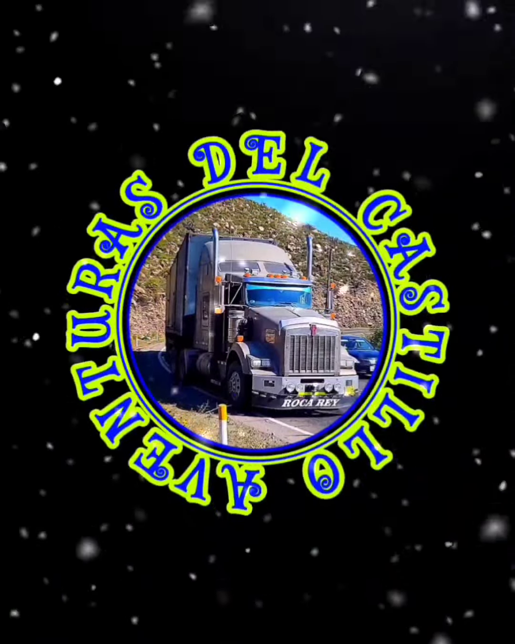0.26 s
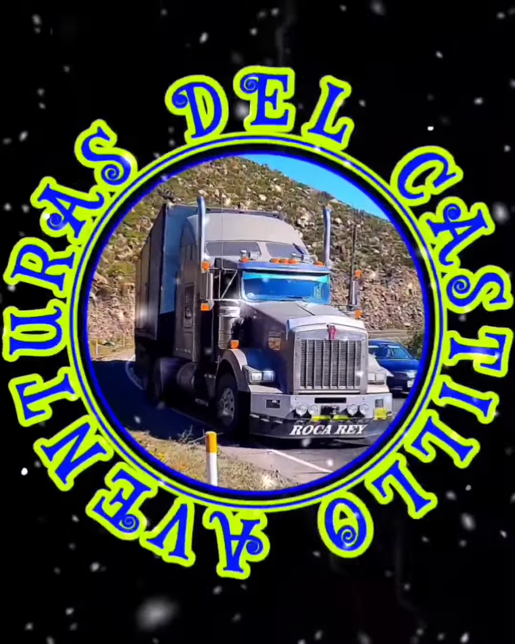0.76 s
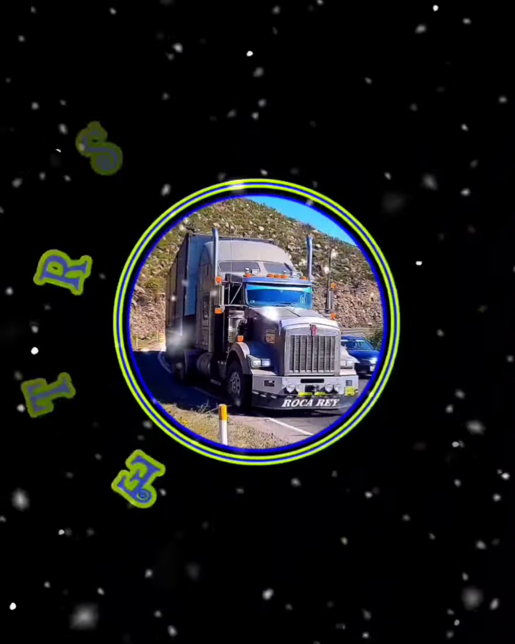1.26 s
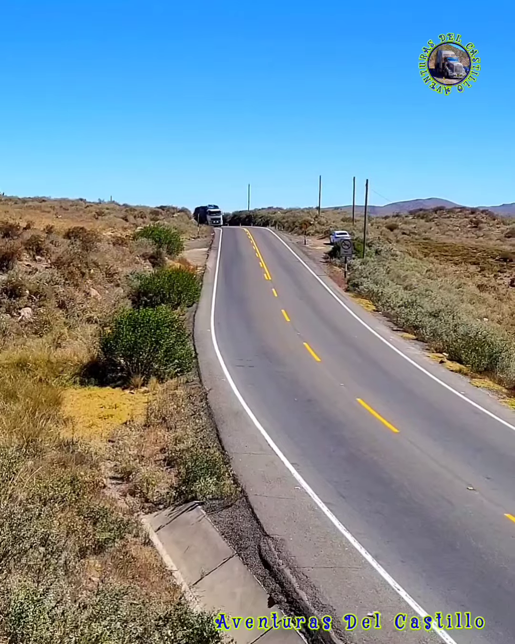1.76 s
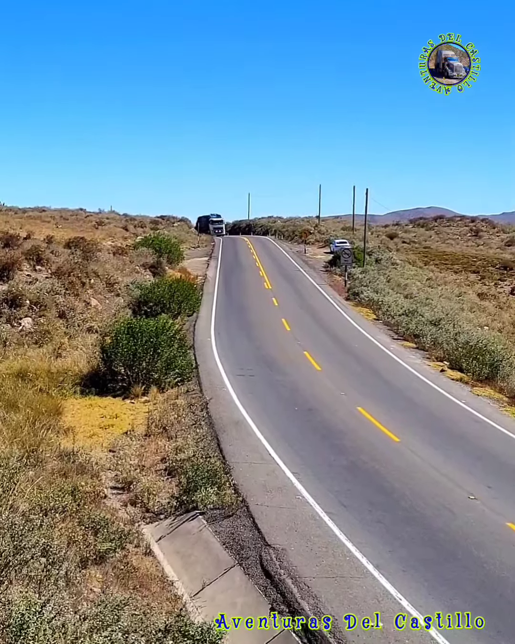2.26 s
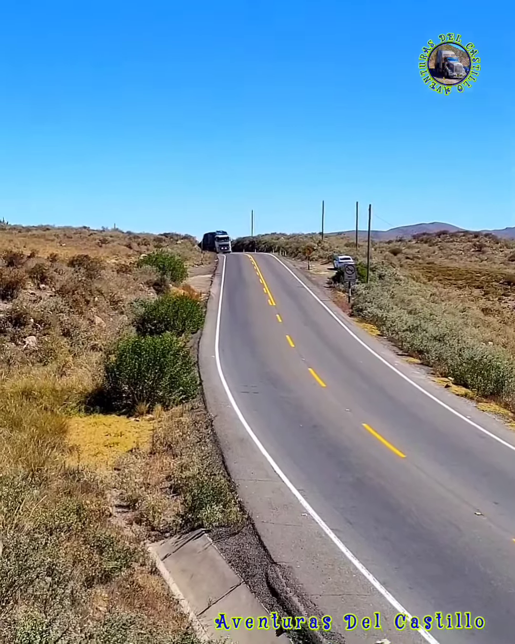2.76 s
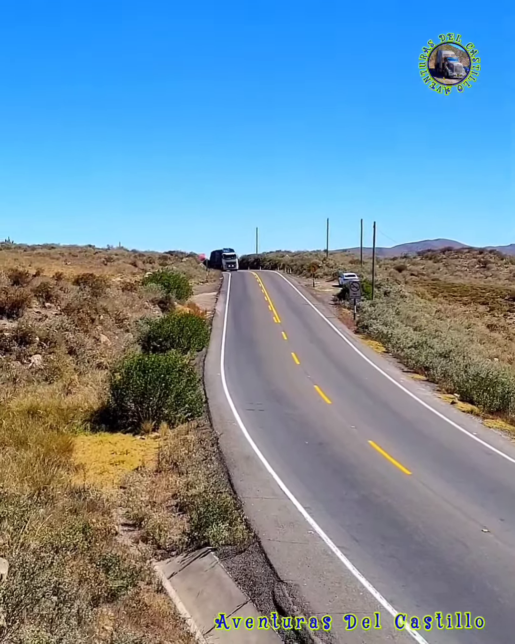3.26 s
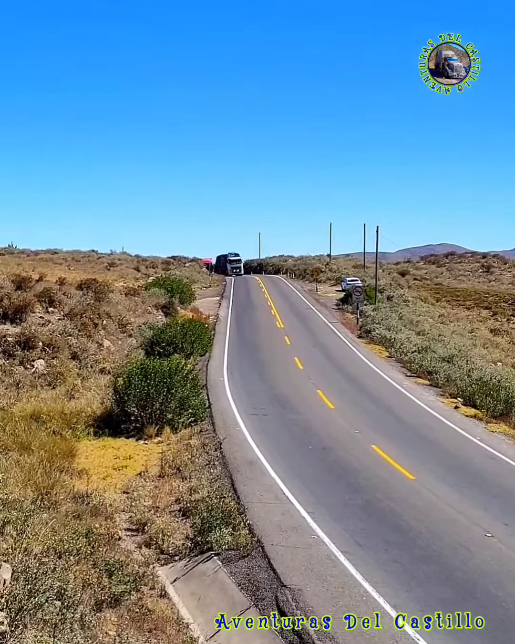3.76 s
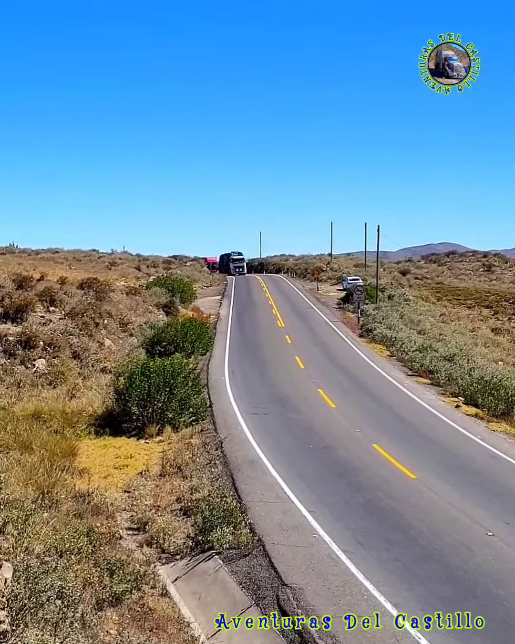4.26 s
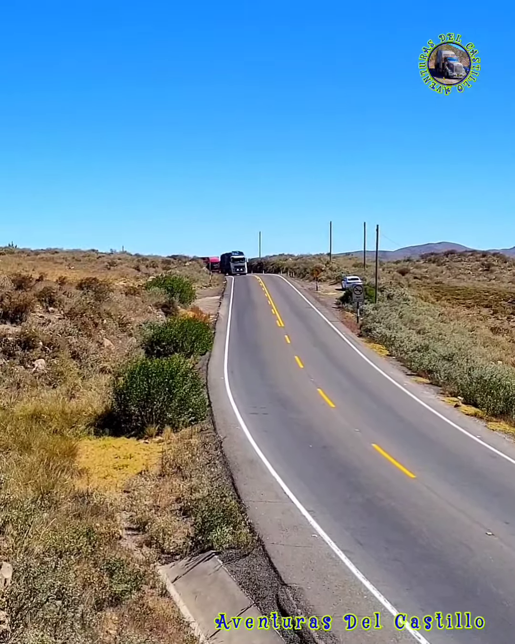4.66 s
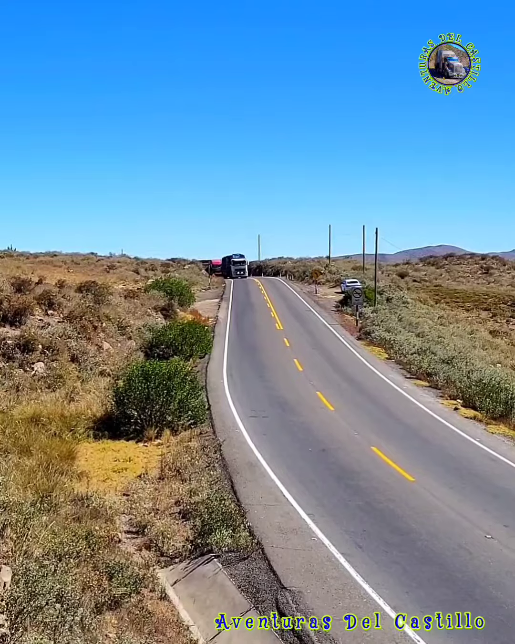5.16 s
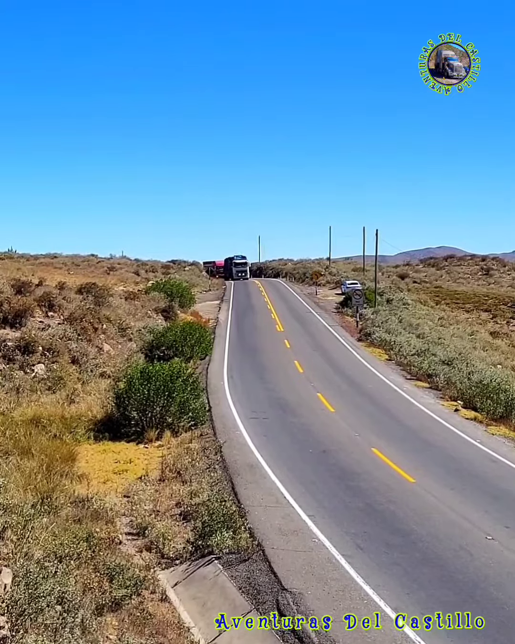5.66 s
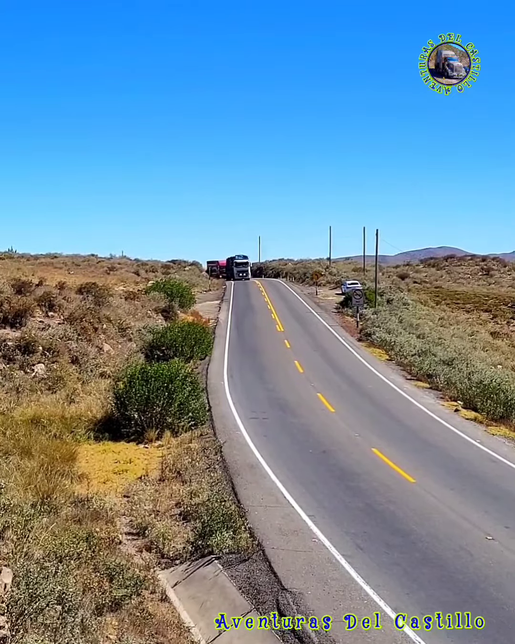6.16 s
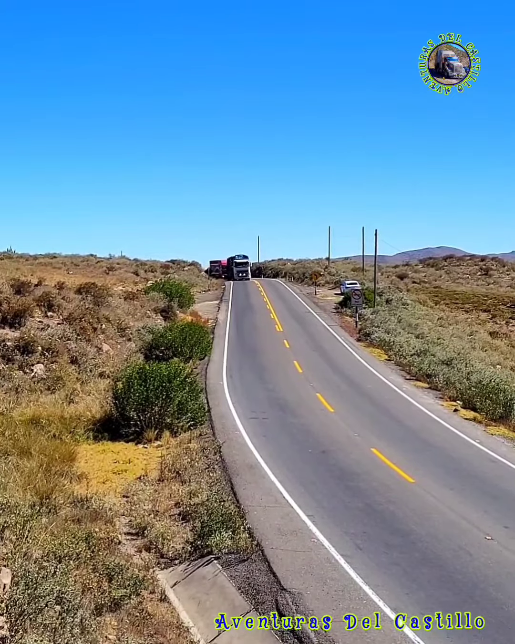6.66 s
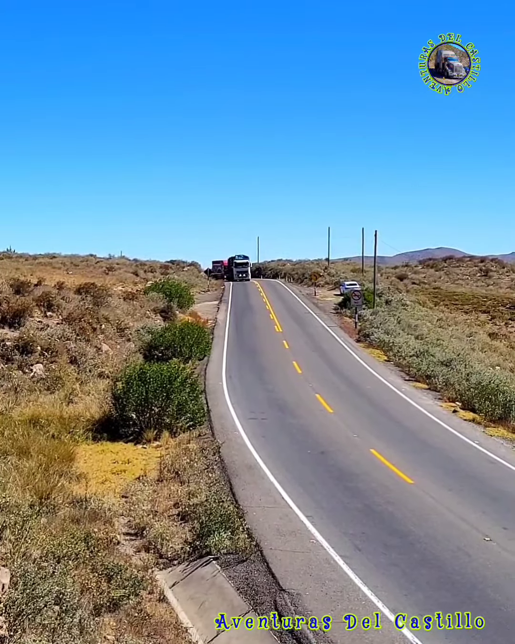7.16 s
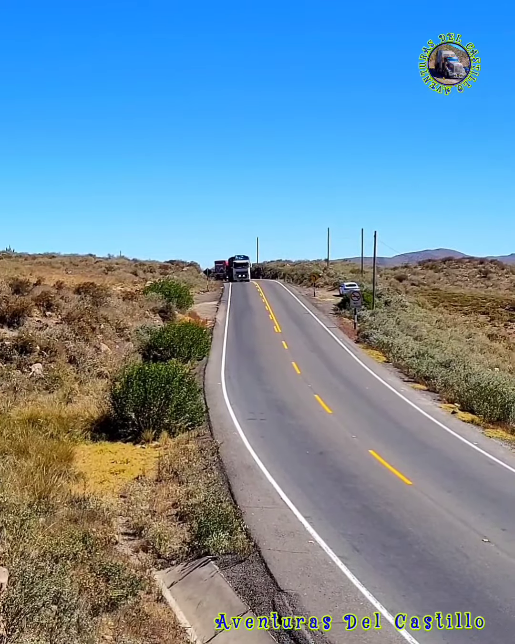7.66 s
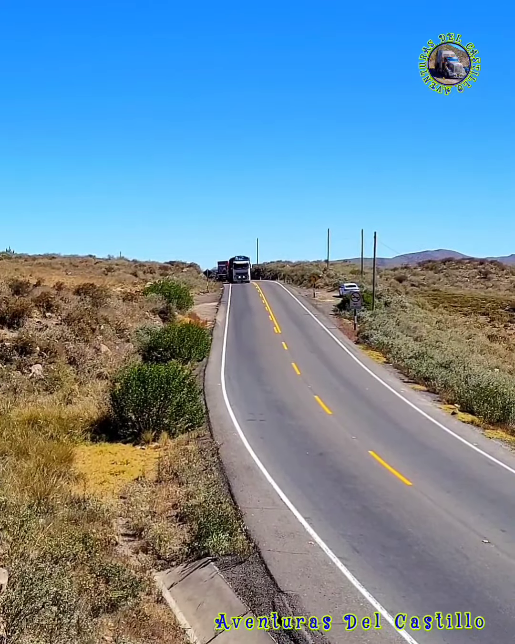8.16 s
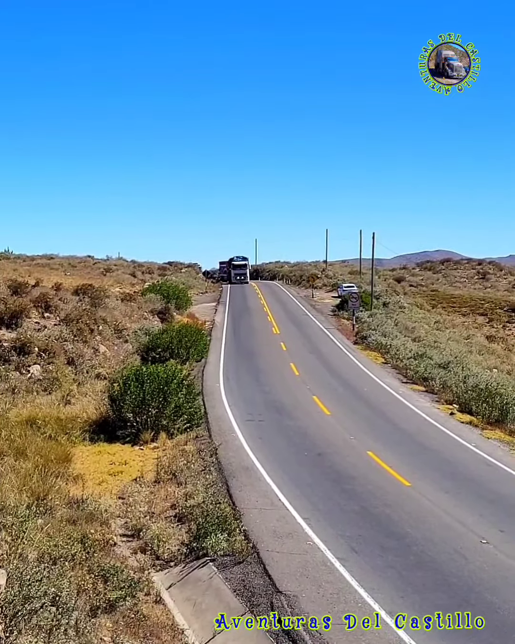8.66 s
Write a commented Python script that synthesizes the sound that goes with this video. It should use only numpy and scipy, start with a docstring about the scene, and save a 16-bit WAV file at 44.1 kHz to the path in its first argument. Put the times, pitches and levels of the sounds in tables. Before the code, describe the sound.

Twin air horns blare three times in under a second, bright and brassy with hissing air and a short dull outdoor echo, above a low diesel engine. Engine and roar continue, then stop dead. A short gap leads to a faint open roadside, where far trucks wash and hum, gradually growing, and soft wind buffets bump the microphone, strongest early on.

```python
"""Twin air horns of a diesel truck close by blast three times over its own engine, drones and road roar.
Each horn is a stack of wavering multiples behind an air valve; the engine is a set of cycle lines.
After a short silence, an open highway: far trucks, made of shaped noise and a narrow drone, rumble
slowly nearer, while wind thumps on the microphone as low noise and brief sine bursts.
Dull ticks, thin rustles and a faint steady hiss lie beneath."""
import sys
import numpy as np
from scipy import signal
from scipy.io import wavfile
from scipy.ndimage import uniform_filter1d

SR = 44100
rng = np.random.default_rng(int(sys.argv[2]) if len(sys.argv) > 2 else 0)


def generate_wav(sig):
    """Save sig (samples, or channels by samples) to the path in sys.argv[1] as 16-bit PCM at SR."""
    pcm = np.round(np.clip(np.atleast_2d(sig).T, -1, 1) * 32767).astype(np.int16)
    wavfile.write(sys.argv[1], SR, pcm)


N = 393813
T = np.arange(N) / SR
NEAR_END_S, FAR_START_S = 1.407, 1.506
EDGE_HZ = 15620  # top of the sound band
OPEN_DB = -19  # below this the horn valve is closing

# horn blasts: opens_s, shuts_s, level_db (at opening, before the sag), rise_s
BLASTS = [(-.02, 0.063, -12.5, 0.0056), (0.195, 0.323, -12, 0.0081), (.413, 0.631, -12.5, .028)]


def gain_of(db):
    """Amplitude factor of a level in dB."""
    return 10 ** (np.asarray(db) / 20)


def evened(x):
    """Scale a signal to rms 1."""
    return x / np.sqrt(np.mean(x ** 2) + 1e-20)


def read(points, hz):
    """Read a curve of (Hz, value) points along log frequency."""
    f, value = np.transpose(points)
    return np.interp(np.log(hz + 1), np.log(f + 1), value)


def columns(rows, t):
    """Glide every column after the first, which is time in s, along t."""
    s, *rest = np.transpose(rows)
    return [np.interp(t, s, column) for column in rest]


def steady(points):
    """A noise colour that stays the same in every frame."""
    return lambda hz, s: read(points, hz) + 0 * s


def wander(t, per_s):
    """Slow chance of rms about 1: sines of random phase up to a rate in cycles per s."""
    f = np.geomspace(per_s / 12, per_s, 12)[:, None]
    coarse = np.arange(t[0], t[-1] + .01, .005)
    sines = np.sin(2 * np.pi * (f * coarse + rng.random(f.shape)))
    slow = (sines / np.sqrt(f)).sum(0)
    return np.interp(t, coarse, slow / np.sqrt(np.sum(.5 / f)))


def noise(t, colour_db, same, patchy_db, flicker_db, lean=((1, 0), (2, 0)), patch_frames=10, patch_bins=14):
    """Stereo noise of rms 1 from random short-time spectra; colour_db(hz, s) shapes each frame."""
    frames, hz = len(t) // 256 + 5, np.fft.rfftfreq(1024, 1 / SR)
    a, b, c, d, patches = rng.standard_normal((frames, 513, 5)).T
    flicker = evened(uniform_filter1d(patches.mean(0), size=3))
    patches = uniform_filter1d(patches, size=round(patch_frames), axis=1)
    patches = evened(uniform_filter1d(patches, size=round(patch_bins), axis=0))

    shape = gain_of(colour_db(hz[:, None], t[0] + np.arange(frames) * 256 / SR))
    shape = shape / np.linalg.norm(shape, axis=0)  # only the balance of the colour counts
    shape = shape * gain_of(patchy_db * patches + flicker_db * flicker)

    like = np.clip(read(same, hz), -1, 1)[:, None]  # left-right likeness
    tilt = gain_of(read(lean, hz) / 2)[:, None]
    left = a + 1j * b
    right = like * left + np.sqrt(1 - like ** 2) * (c + 1j * d)
    spectra = shape * np.array([left * tilt, right / tilt])
    return evened(signal.istft(spectra, nperseg=1024, noverlap=768)[1][:, :len(t)])


def drone(width_hz, rows, t, fuzz):
    """A tone mixed with noise in a narrow band round it; fuzz is the noise's share of the mix."""
    hz, db = columns(rows, t)
    keep = np.exp(-np.pi * width_hz / SR)
    chance = rng.standard_normal((len(t) + SR, 2)) @ [1, 1j]
    blur = signal.lfilter([1], [1, -keep], chance)[SR:] * np.sqrt((1 - keep ** 2) / 2)
    blur = uniform_filter1d(blur.real, size=300) + 1j * uniform_filter1d(blur.imag, size=300)
    carrier = np.exp(2j * np.pi * np.cumsum(hz) / SR)
    wave = (np.sqrt(1 - fuzz) + np.sqrt(fuzz) * blur) * carrier
    return np.sqrt(2) * gain_of(db) * wave.real


def horns(t):
    """Both trumpets open together over hissing air; the hillside sends a short, dull wash back."""
    # each trumpet: pitch_hz, then the relative level_db of its multiples 1, 2, 3, ..
    low_horn = 208.7, [-13, -11, -13, -2.5, -6.5, -10.5, -6.5, -14, -15.5, -12, -11, -12, -13, -8, -15.5,
                -14, -15, -18.5, -21, -17.0, -16.5, -18.5, -17, -18, -14, -18.5, -18.5, -17, -18, -13.5]
    high_horn = 259.3, [-5.5, -6, -6, -4, -6.5, -7.5, -13, -12.5, -10, -14, -8, -16, -11.5, -13.5, -17.5,
                 -17.5, -17, -20, -14.5, -17, -17, -18, -17, -11]
    # share of the closing fall that the low partials of the low and the high trumpet escape
    low_linger, high_linger = 0.18, 0.26
    # hiss of the air through the horns: pitch_hz, relative density_db (per Hz)
    air_jet = [(300, -25.5), (1200, -4.5), (4000, -9), (9600, -16.5), (15000, -17)]

    t_open = t[:round(.75 * SR)]  # the horns are over by .75 s
    jet = noise(t_open, steady(air_jet), [(500, .8), (5000, .2)], patchy_db=1.0, flicker_db=1.6)
    pair = trumpet(t_open, *low_horn, low_linger) + trumpet(t_open, *high_horn, high_linger)
    both = (evened(pair) + gain_of(-20.0) * jet) * gain_of(valve_db(t_open))
    both = np.pad(both, ((0, 0), (0, len(t) - len(t_open))))

    lag = np.arange(SR // 2) / SR
    taps = rng.standard_normal((2, len(lag))) * gain_of(-60 * lag / 0.3) * (lag > .012)
    taps = signal.lfilter(*signal.butter(1, 4000, fs=SR), taps)
    echo = signal.fftconvolve(both, taps / np.linalg.norm(taps[0]), axes=1)[:, :len(t)]
    return both + gain_of(-17) * echo


def trumpet(t, hz, levels_db, linger):
    """A beating diaphragm gives every multiple; reflections make each swell and shift by itself on each side."""
    # upper partials past the listed multiples: pitch_hz, relative level_db
    bell = [(6500, -19), (8000, -20.5), (9600, -27), (12000, -23), (15000, -30.5)]
    # as the truck moves on, some partials swell, others sink and the treble dulls: pitch_hz, drift_db_per_s
    horn_drift = [(500, 4.5), (790, 16), (1040, -11), (1280, 8), (1460, -10), (1670, 17.5), (1815, -12),
                  (1900, 5.5), (3300, -0.5), (3900, -6.5)]
    # stereo balance: pitch_hz, left_minus_right_db
    horn_lean = [(600, 0.5), (2500, 3.5), (5000, 1), (9000, -5.5), (13000, 0)]
    burst_peak_db, burst_s = 4, 0.024  # first rush of air, driving the low partials harder

    turns = np.cumsum(hz * (1 + .0008 * wander(t, 20) + .001 * wander(t, 90))) / SR
    out = np.zeros((2, len(t)))
    closing_db = np.clip(valve_db(t) - OPEN_DB, -20, 0)
    burst_db = sum(burst_peak_db * np.exp(-abs(t - opens - rise) / burst_s) for opens, _, _, rise in BLASTS)
    opened = np.transpose(BLASTS)[0]
    held_s = t - opened[np.searchsorted(opened, t) - 1]
    dull_db = -55 * np.maximum(held_s - .11, 0)  # the treble fails first in a long blast

    for k in range(1, int(EDGE_HZ / hz)):
        partial_hz = k * hz
        level_db = levels_db[k - 1] if k <= len(levels_db) else read(bell, partial_hz)
        low = max(1 - partial_hz / 4000, -.5)  # low partials outlast the treble as the air fails
        swell_db = low * (burst_db - linger * closing_db)
        swell_db = swell_db + read(horn_drift, partial_hz) * (t - .3)
        swell_db = swell_db + dull_db * np.clip(partial_hz / 2000 - 1.5, 0, 1) + 3.0 * wander(t, 12)
        start = rng.random()
        apart = min(partial_hz / 4000, 1.6)  # short waves reach the two ports differently
        for side, lean_db in zip(out, read(horn_lean, partial_hz) * np.array([.5, -.5])):
            gain = gain_of(level_db + swell_db + lean_db + 1.5 * apart * wander(t, 6))
            shift = 1.1 * apart * wander(t, 8)
            side += gain * np.cos(2 * np.pi * (k * turns + start) + shift)
    return out


def valve_db(t):
    """Each blast rises quickly, sags while held and falls away ever faster once shut."""
    sag_db_per_s = 15.5  # the air tank runs down while the valve is open
    shut_db, release_s, release_bend = -49.5, .057, 1.3  # shut level, time to fall to it, shape of the fall
    opens, shuts, db, rise = np.transpose(BLASTS)[:, :, None]
    held_db = db - sag_db_per_s * (t - opens)
    unopened = np.maximum(1 - (t - opens) / rise, 0)
    released = (np.maximum(t - shuts, 0) / release_s) ** release_bend
    blasts_db = held_db + (shut_db - held_db) * (unopened + released)
    return np.maximum(blasts_db.max(0), shut_db - 19.5)


def engine(t):
    """Lines at multiples of the engine cycle, the lower ones unsteady; their balance turns as the truck moves."""
    # engine speed: time_s, cycles_per_s
    speed = [(0, 19.5), (.6, 18.9), (1.41, 19.25)]
    # engine lines: multiple of the cycle, first_db, last_db
    firing = [(3, -28.5, -23.5), (4, -19, -26.5), (6, -33.5, -27), (8, -33.5, -26), (10, -30, -24.5),
              (12, -26, -17)]
    turns, way = np.cumsum(columns(speed, t)[0]) / SR, t / NEAR_END_S
    out = np.zeros(len(t))
    for k, first_db, last_db in firing:
        level_db = first_db + (last_db - first_db) * way + 6 / k * wander(t, 10)
        out += gain_of(level_db) * np.cos(2 * np.pi * (k * turns + rng.random()))
    return np.sqrt(2) * out


def truck_drones(t):
    """Wavering narrow-band tones, stronger on the right; the last two beat together."""
    # each drone: width_hz, then rows of time_s, pitch_hz, level_db (before the stereo lean)
    drones = [(3, [(0, 139.1, -22), (.55, 138.4, -20.5), (.9, 141, -28.5), (1.41, 141.1, -22.5)]),
              (30, [(0, 261, -15.5), (.53, 264.5, -19.5), (.65, 263.3, -38.5), (1.41, 264, -46)]),
              (1.997, [(0, 485.8, -40), (1.41, 483.5, -33.5)]), (2, [(0, 496.5, -40.5), (1.41, 495, -35)])]
    return gain_of([[-1.5], [1.5]]) * sum(drone(*rows, t, fuzz=.3) for rows in drones)


def road_roar(t):
    """Broad noise of steady colour whose level swells, then sinks."""
    # roar colour: pitch_hz, relative density_db (per Hz)
    colour = [(12, -38), (20, -8), (196, -6.5), (232, -9), (259, -11), (372, -27.5), (491, -17),
              (581, -21.5), (1200, -22.5), (1380, -29), (2680, -31.5), (15500, -74)]
    # roar level: time_s, level_db
    level = [(0, -16.5), (.4, -14.5), (.7, -18), (1.41, -19)]
    # stereo width: pitch_hz, left-right likeness (0 to 1)
    same = [(250, .975), (640, .88), (1400, .53), (3100, 0), (6800, .44)]
    return noise(t, steady(colour), same, patchy_db=1.1, flicker_db=1.0) * gain_of(columns(level, t)[0])


def near_truck():
    """Horns, engine, drones and roar; the sound drops for its last moments and stops dead."""
    t = T[:round(NEAR_END_S * SR)]
    mix = horns(t) + engine(t) + truck_drones(t) + road_roar(t)
    return mix * np.where(t > 1.398, gain_of(-8.0), 1)


def highway(t):
    """Tyre and exhaust wash, dulled by the air on its long way; it reaches the left port first."""
    # approach: time_s, level_db of the wash without its whines, treble_db_per_khz regained as trucks near
    approach = [(1.51, -51, -1.5), (2.7, -49, -2), (4.5, -44.5, -1.5), (5.2, -47, -2), (5.8, -43.5, 0),
                (7.2, -42.5, 0), (7.9, -38.5, 1), (8.4, -39.5, 0.5), (8.93, -41, 1)]
    # wash colour: pitch_hz, relative density_db (per Hz)
    tyres = [(90, -44), (160, -19), (260, -6.5), (500, 0), (640, -3.5), (1400, -6), (1780, -14),
             (1900, -18), (2700, -22), (2850, -32.5), (3200, -32.5), (3500, -45.5), (3900, -51),
             (4100, -63), (7000, -97)]
    # stereo width: pitch_hz, left-right likeness (0 to 1)
    same = [(100, 0.59), (600, 1), (1700, 0.87), (4000, 0.52)]
    # stereo balance: pitch_hz, left_minus_right_db
    lean = [(200, 1.5), (700, 1), (2400, -2), (4400, -23.5)]
    # faint tones in the wash: pitch_hz, level_db relative to the wash
    whines = [(536, -14.5), (1000, -13), (1242, -17.5)]
    # far drone: width_hz, then rows of time_s, pitch_hz, level_db
    far_drone = 7, [(1.5, 259.1, -46), (2.2, 259.2, -46.5), (2.86, 259, -57), (3.5, 258.5, -46),
                 (4.1, 257.9, -44.5), (4.25, 257.7, -49), (4.6, 257.4, -44), (5.05, 257, -41),
                 (5.2, 256.5, -51.5), (5.8, 255.8, -45.5), (7.38, 252.4, -42.5), (7.52, 253.2, -47.5),
                 (8.05, 253.2, -42.5), (8.35, 247.6, -51)]

    def colour_db(hz, s):
        treble_db_per_khz = columns(approach, s)[1] + .5 * wander(s, 25)
        treble_db = treble_db_per_khz * np.minimum(hz, 3000) / 1000
        # moving air shifts the dips of the ground echo
        ground_db = 2.26 * np.sin(hz / 130 + 2 * wander(s, 0.59))
        return read(tyres, hz) + treble_db + ground_db

    wash = noise(t, colour_db, same, patchy_db=2.5, flicker_db=0.67, lean=lean, patch_frames=24, patch_bins=2)
    for hz, db in whines:
        wash = wash + drone(16, [(t[0], hz, db)], t, fuzz=1)
    far = wash * gain_of(columns(approach, t)[0]) + drone(*far_drone, t, fuzz=.1)
    return np.array([far[0], np.roll(far[1], 2)])  # right side 2 samples late


def wind(t):
    """Lumpy low noise, and single eddies that shake the diaphragm for a few cycles."""
    # buffet colour: pitch_hz, relative density_db (per Hz)
    buffet = [(15, -33.5), (30, 5.5), (50, -2.5), (80, 5.5), (110, -17.5), (180, -7.5), (300, -18.5),
              (600, -77), (2000, -110)]
    # wind thumps: start_s, peak_db, pitch_hz, length in cycles
    thumps = [(2.15, -31, 55, 2.5), (2.73, -29, 60, 1.34), (2.769, -28.5, 56.5, 1.5), (2.84, -32, 55, 1.5),
              (2.883, -17.5, 57.5, 1.94), (2.912, -14.5, 63, 1.7), (2.944, -27.5, 56.5, 1.8),
              (3.039, -26.5, 75.4, 2), (5.083, -24.5, 63.8, 3.1), (6.3, -29, 90, 2.3), (6.7, -26, 115, 1.6),
              (7.013, -27.5, 62, 2.9), (7.448, -26.5, 61.8, 3.4), (8.066, -27, 72.7, 3.3),
              (8.76, -28.5, 52.8, 1.9)]
    start_db, rise_db_per_s = -42, .5
    lumps = noise(t, steady(buffet), [(20, 0.97), (200, 0.94)], patchy_db=0.5, flicker_db=1.5)
    out = lumps * gain_of(start_db + rise_db_per_s * (t - t[0]) + 2.76 * wander(t, 12))
    for s, db, hz, cycles in thumps:
        u = (t - s) * hz / max(cycles, .6)  # 0 to 1 through the thump
        at = (u > 0) & (u < 1)
        out[:, at] += gain_of(db) * np.sin(np.pi * u[at]) * np.sin(2 * np.pi * hz * (t[at] - s))
    return out


def ticks(t):
    """Dull ticks and thin rustles right at the microphone, over a faint uneven fizz."""
    # dull ticks: start_s, peak_db, pitch_hz
    dull_ticks = [(2.764, -36, 800), (2.915, -32, 800), (2.948, -31, 900)]
    # thin rustles: start_s, level_db (rms at the crest), length_s, centre_hz
    rustles = [(2.62, -79, .09, 4300), (2.703, -72, .014, 5600), (2.977, -74, .025, 5200),
               (3.02, -78, .02, 5000), (5.103, -77, .01, 4200)]
    air = rng.standard_normal((2, len(t)))

    def band(lo_hz, hi_hz):
        sos = signal.butter(4, [lo_hz, hi_hz], "bandpass", fs=SR, output="sos")
        return evened(signal.sosfilt(sos, air))

    out = band(4600, 7200) * gain_of(-93.5 + 2.5 * wander(t, 5) + 1.5 * wander(t, 60))  # fizz
    for s, db, hz in dull_ticks:
        u = np.clip(t - s, 0, 1)
        swell = np.sin(np.pi * np.clip(u * hz / 2, 0, 1)) ** 2  # two cycles long
        out += gain_of(db) * swell * np.sin(2 * np.pi * hz * u)
    for s, db, length, hz in rustles:
        swell = np.sin(np.pi * np.clip((t - s) / length, 0, 1)) ** 2
        out += gain_of(db) * swell * band(hz / 1.22, hz * 1.22)
    return out


def faint_hiss(t):
    """A very faint, steady, flat hiss, separate on each side."""
    return gain_of(-91) * rng.standard_normal((2, len(t)))


def scene():
    """The near truck, a short silence, then the windy highway."""
    out, near, start = np.zeros((2, N)), near_truck(), round(FAR_START_S * SR)
    out[:, :near.shape[1]] = near
    t = T[start:]
    out[:, start:] = highway(t) + wind(t) + ticks(t) + faint_hiss(t)
    return out


def record(dry):
    """Peaks beyond full scale are clipped; then a steep low-pass limits the band."""
    edge = signal.firwin(1023, EDGE_HZ, window=("kaiser", 9), fs=SR)
    return signal.oaconvolve(np.clip(dry, -1, 1), edge[None], "same")


dry = scene()
out = record(dry)
generate_wav(out)
```